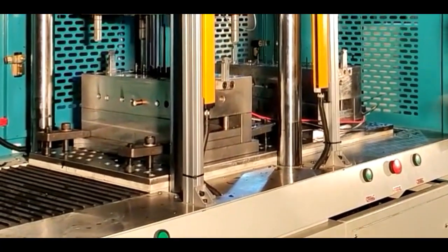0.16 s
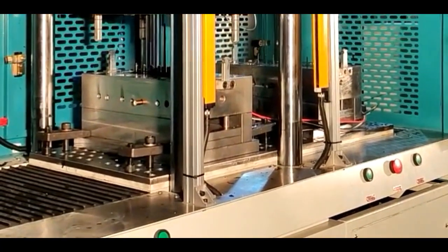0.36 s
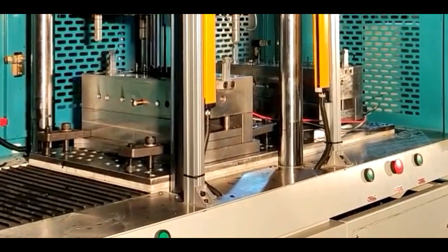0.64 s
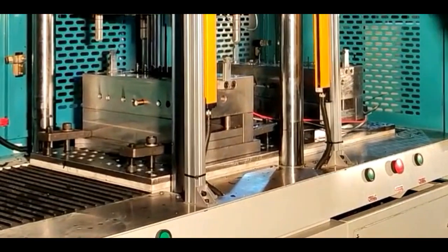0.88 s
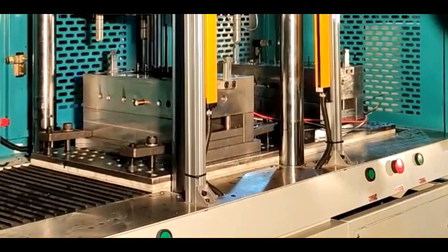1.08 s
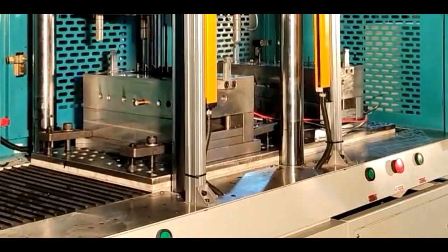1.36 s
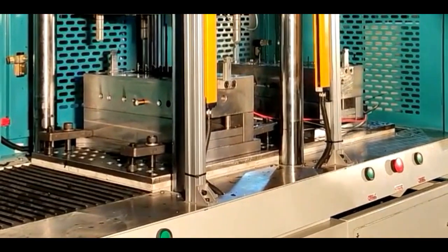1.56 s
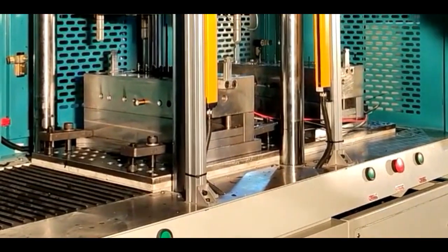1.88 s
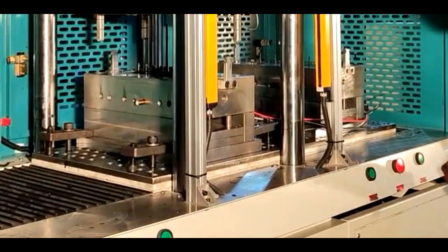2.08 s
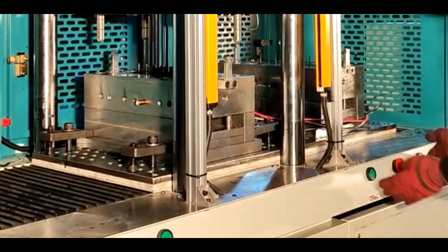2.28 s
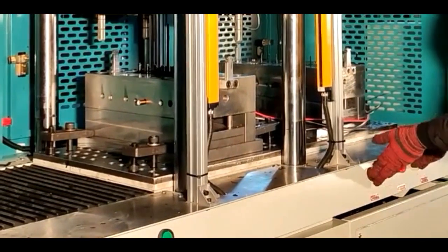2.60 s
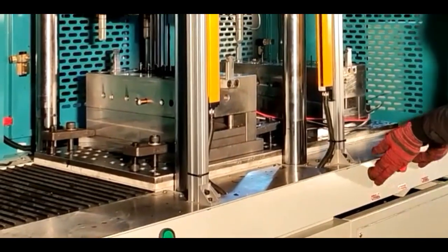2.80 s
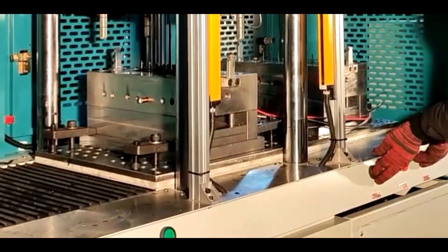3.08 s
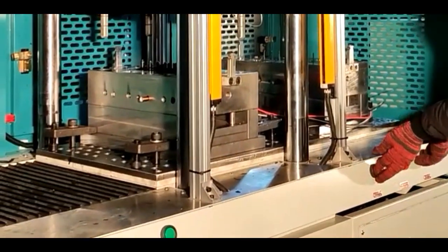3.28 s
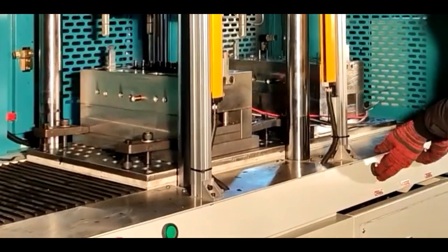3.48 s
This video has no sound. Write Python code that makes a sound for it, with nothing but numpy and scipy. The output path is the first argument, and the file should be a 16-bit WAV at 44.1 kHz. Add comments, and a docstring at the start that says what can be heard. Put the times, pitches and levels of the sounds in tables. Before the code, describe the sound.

Idling moulding machine with fading air hiss, a sharp steel clack, scrape and sheet-metal judder

```python
"""A moulding machine idles in a workshop: pump-motor sines whine over mains hum and a roar of noise.
From the start the filtered-noise hiss of an air gun dies away and small parts tick (rings and noise).
A steel part clacks (noise bursts, decaying modes) and scrapes (random grains ringing a chute, hiss).
Something drops on a sheet-metal panel, whose modes judder; at the end a slide starts to roll (noise,
frame modes). Events get a hall tail; gain control and a low-pass shape the whole."""
import sys
import numpy as np
from scipy import signal
from scipy.io import wavfile
from scipy.ndimage import uniform_filter1d

SR = 44100
rng = np.random.default_rng(int(sys.argv[2]) if len(sys.argv) > 2 else 0)


def unload_audio(sound):
    """Save the sound as a 16-bit wav file, at the path given as the first command line argument."""
    columns = np.transpose(np.atleast_2d(sound))
    # keep every value between -1 and 1, then stretch to whole-number steps
    steps = np.round(np.clip(columns, -1, 1) * 32767)
    wavfile.write(sys.argv[1], SR, steps.astype(np.int16))


N = 160965  # samples


def amp(db):
    """Amplitude factor of a level in dB."""
    return 10 ** (np.asarray(db) / 20)


def rms_one(x):
    """Scale to rms 1."""
    return x / np.sqrt(np.mean(x ** 2) + 1e-20)


def seconds():
    """Time axis in s."""
    return np.arange(N) / SR


def curve(rows, column):
    """Gain from one dB column, interpolated in time, silent outside its span."""
    rows = np.array(rows)
    return amp(np.interp(seconds(), rows[:, 0], rows[:, column], left=-200, right=-200))


def drift(rate_hz):
    """Slow random signal, rms 1: noise through two equal poles, run at SR / 40."""
    pole = np.exp(-2 * np.pi * rate_hz * 40 / SR)
    noise = rng.standard_normal(N // 40 + 2002)
    slow = signal.lfilter([1], [1, -2 * pole, pole * pole], noise)[2000:]  # start-up dropped
    slow = rms_one(slow - slow.mean())
    return np.interp(np.arange(N) / 40, np.arange(len(slow)), slow)


def ring(drive, f_hz, t60_s):
    """Damped resonator: a unit click sets a decaying sine of height 1 ringing."""
    radius = amp(-60 / (t60_s * SR))
    w = 2 * np.pi * f_hz / SR
    return signal.lfilter([0, np.sin(w)], [1, -2 * radius * np.cos(w), radius ** 2], drive + 1e-18)


def modes(drive, table):
    """Resonators on a shared drive, each scaled to rms 1 before its level."""
    return sum(amp(db) * rms_one(ring(drive, f_hz, t60_s)) for f_hz, db, t60_s in table)


def burst(start_s, attack_s, t60_s):
    """Envelope: linear rise, then exponential fall."""
    t = seconds() - start_s
    fall_db = -60 * np.clip(t - attack_s, 0, None) / t60_s
    return np.clip(t / attack_s, 0, 1) * amp(fall_db)


def filtered(x, order, f_hz, kind):
    """Butterworth filter."""
    return signal.sosfilt(signal.butter(order, f_hz, kind, fs=SR, output="sos"), x)


def coloured(spectrum, patchy_db=0.0):
    """Noise in third-octave bands, each with its own level and flicker; rms 1."""
    f_hz, level_db = np.transpose(spectrum)
    edges_hz = f_hz[0] * 2 ** np.arange(0, np.log2(9000 / f_hz[0]) + .3, 1 / 3)
    white = rng.standard_normal((2, N + 8192))  # neighbouring bands use different noise
    out = 0
    for k, (low, high) in enumerate(zip(edges_hz, edges_hz[1:])):
        band = filtered(white[k % 2], 2, [low, high], "band")[8192:]
        flicker_db = patchy_db * drift(5.8) if patchy_db else 0
        band_db = np.interp(np.log(low * high) / 2, np.log(f_hz), level_db)
        out = out + band * amp(band_db + flicker_db)
    return rms_one(out)


SHAFT_HZ = 47.9
# whine of motor and pump: multiple of SHAFT_HZ [1], mean rms level/dB
WHINE_LINES = [(5, -60), (8, -60.5), (15, -60.5), (16, -63), (18, -61.5), (19, -54), (24, -63), (36, -54),
               (37, -58.5), (39, -64.5), (71, -73), (72, -59), (73, -67), (126, -63)]
WHINE_WAVER_DB, WHINE_FLUTTER_DB_PER_KHZ = 1.0, 0.5
# narrow unsteady hums: mean f/Hz, rms wander/Hz, mean rms level/dB
HUM_LINES = [(26.4, 2.3, -56), (42, 1.3, -53.5), (101.1, 1.87, -49), (204.4, 5, -56.5), (241, 2.3, -55.5),
             (445, 3.73, -62.5)]
HUM_WAVER_DB = 2.5


def motor():
    """Rotation gives steady multiples of the shaft speed; hums wander in pitch and level."""
    out = 0
    for multiple, db in WHINE_LINES:
        f_hz = multiple * SHAFT_HZ
        flutter_db = WHINE_FLUTTER_DB_PER_KHZ * f_hz / 1e3 * drift(32)
        level_db = db + WHINE_WAVER_DB * drift(2.2) + flutter_db
        turns = f_hz * seconds() + rng.random()
        out = out + np.sqrt(2) * amp(level_db) * np.sin(2 * np.pi * turns)
    for f_hz, wander_hz, db in HUM_LINES:
        turns = np.cumsum(f_hz + wander_hz * drift(3.8)) / SR + rng.random()
        level_db = db + HUM_WAVER_DB * drift(4.5)
        out = out + np.sqrt(2) * amp(level_db) * np.sin(2 * np.pi * turns)
    return out


CLACK_S, CLACK_ATTACK_S = 1.3543, 0.0025
CRASH_DB, CRASH_T60_S = -12.5, 0.057  # level before envelope and high-pass
CLATTER_DB, CLATTER_ATTACK_S, CLATTER_T60_S = -22, 0.012, 0.18  # likewise
STEEL_DB, BLOW_T60_S = -22, 0.0078
# crash: f/Hz, relative level/(dB per Hz)
CRASH_SPECTRUM = [(900, -28), (1300, -10.5), (1750, -8), (2650, -12.5), (3190, -13), (4200, 0.5),
                  (5170, -5), (6090, -3), (7200, -6), (9500, -25)]
# clatter after the crash: f/Hz, relative level/(dB per Hz)
CLATTER_SPECTRUM = [(900, -39), (1500, -8.5), (2300, 0), (3200, -1.5), (4500, -6), (6500, -9), (9500, -16)]
# modes of the steel part: f/Hz, relative level/dB, t60/s
STEEL_MODES = [(1100, -12, 0.092), (1630, -11.5, 0.14), (2190, -7, 0.094), (3197, -1, 0.12),
               (3410, -9, .07), (3740, -8, 0.18), (4350, -13, .05), (5170, 0, 0.093), (6000, 4.5, 0.044),
               (6120, -3.5, 0.051), (6540, -6.5, 0.12)]


def clack():
    """Impact: a bright crash, a longer clatter, and a short blow that rings the steel modes."""
    crash = coloured(CRASH_SPECTRUM) * burst(CLACK_S, CLACK_ATTACK_S, CRASH_T60_S)
    clatter = coloured(CLATTER_SPECTRUM) * burst(CLACK_S, CLATTER_ATTACK_S, CLATTER_T60_S)
    noise = amp(CRASH_DB) * crash + amp(CLATTER_DB) * clatter
    blow = rng.standard_normal(N) * burst(CLACK_S, CLACK_ATTACK_S, BLOW_T60_S)
    blow /= np.sqrt(np.sum(blow ** 2))  # unit energy
    steel = sum(amp(STEEL_DB + db) * ring(blow, f_hz, t60_s) for f_hz, db, t60_s in STEEL_MODES)
    return filtered(noise, 4, 1150, "high") + steel


# scrape course: t/s, body level/dB, hiss level/dB
SCRAPE_LEVELS = [(1.42, -64.5, -49.5), (1.445, -63, -42), (1.465, -41.5, -31), (1.485, -44, -38),
                 (1.497, -33, -38), (1.525, -36, -28.5), (1.55, -40, -33), (1.59, -41.5, -38),
                 (1.62, -42.5, -44.5), (1.65, -43.5, -50), (1.68, -58, -50.5), (1.78, -54, -52)]
# modes the scrape rings: f/Hz, relative level/dB, t60/s
CHUTE_MODES = [(457, -2, 0.033), (730, -3, 0.023), (994, -4, 0.014), (1715, -6.5, 0.026), (1990, -6, .02),
               (2250, 1, 0.023)]
GRAINS_PER_S, GRIT_DB = 2500, 0.5  # grit relative to chute modes


def scrape():
    """Dense uneven contacts sound as grit and ring the chute; friction hisses above."""
    hits = rng.random(N) < GRAINS_PER_S / SR
    size_db = 3.8 * np.minimum(rng.exponential(1, N), 3)
    grains = hits * amp(size_db) * rng.choice([-1, 1], N)
    rings = modes(grains, CHUTE_MODES)
    grit = filtered(grains, 2, [330, 1600], "band")
    hiss = filtered(rng.standard_normal(N), 2, 2500, "high")
    body = rms_one(rms_one(rings) + amp(GRIT_DB) * rms_one(grit))
    return curve(SCRAPE_LEVELS, 1) * body + curve(SCRAPE_LEVELS, 2) * rms_one(hiss)


# ticks, pings, clanks of small parts:
# t/s, level/dB, f/Hz, half-bandwidth/f [1] (clipped to 0.01-0.8), attack/s, t60/s
TICK_EVENTS = [(0.577, -35, 7600, .1, .002, .03), (.585, -28, 7770, 0.12, .002, 0.044),
               (1.190, -22, 5860, .7, 0.0012, .015), (1.336, -32, 2420, 0.41, 0.0034, 0.083),
               (1.489, -29.5, 1720, 0.027, 0.003, 0.075), (1.490, -28, 2180, .04, .004, 0.05),
               (1.456, -34.5, 5000, 0.39, .004, .05), (1.478, -30.5, 2350, .05, .004, .08),
               (1.488, -33.5, 1315, 0.0075, .008, .25), (1.572, -37, 1305, 0.011, 0.0098, .25),
               (1.628, -41.5, 1318, 0.012, 0.0056, .2), (1.575, -34, 477, 0.14, 0.013, .1),
               (1.882, -43, 1320, 0.011, 0.0089, .3), (1.885, -37, 750, 0.68, .02, .2),
               (1.952, -39, 4480, 0.85, .004, .06), (2.016, -32, 5000, 0.5, .005, .08),
               (1.519, -22.5, 7040, 0.064, .003, .05), (1.528, -21.5, 7500, 0.09, 0.0035, 0.027),
               (1.7954, -31.5, 7330, 0.2, 0.00077, 0.06), (1.8200, -19.5, 3300, 0.036, 0.001, 0.011),
               (1.8197, -19.5, 5720, 0.25, 0.00091, 0.025), (1.8240, -14, 3050, 0.016, 0.0021, 0.014),
               (1.8250, -17, 5200, .05, .001, 0.005), (1.8250, -19, 2180, 0.028, 0.00053, .018),
               (1.825, -27, 7000, .1, 0.00083, 0.0081), (3.303, -33, 6600, 0.16, .001, 0.022),
               (3.355, -42, 2910, .05, .003, .04), (3.375, -36, 2386, 0.062, 0.0074, 0.037),
               (3.610, -32, 988, 0.15, .012, .12)]


def ticks():
    """Each tick is a ring and noise about its pitch; the wider it is, the noisier."""
    out, white = 0, rng.standard_normal(N)
    for start_s, db, f_hz, width, attack_s, t60_s in TICK_EVENTS:
        width = np.clip(width, .01, .8)
        band = filtered(white, 2, [f_hz * (1 - width), f_hz * (1 + width)], "band")
        noisy = min(1, 6 * width)
        sine = np.sin(2 * np.pi * f_hz * (seconds() - start_s))
        tone = (1 - noisy) * sine + noisy * rms_one(band) / 2
        out = out + amp(db) * burst(start_s, attack_s, t60_s) * tone
    return out


# knocks on the panel: t/s, drive level/dB
KNOCK_EVENTS = [(1.941, -22.5), (1.979, -26.5), (2.004, -22), (2.039, -24), (2.079, -29.5), (2.11, -29.5),
                (2.149, -33.5), (2.181, -33), (2.205, -36), (2.259, -41), (2.276, -32.5), (2.319, -35),
                (2.348, -45), (2.384, -38.5), (2.411, -40), (2.479, -37)]
KNOCK_HZ, KNOCK_T60_S = 193, 0.017
KNOCK_LEAD_S = 0.00705  # push starts this long before the listed time
# panel modes: f/Hz, relative level/dB, t60/s
PANEL_MODES = [(87, -11, 0.13), (133.4, -13, 0.21), (183.3, 5, 0.054), (209, 6, 0.053),
               (286.5, -4.5, 0.078), (367, -4, 0.055), (446, -6, 0.067), (597, -5, 0.062)]
# loose parts: f/Hz, relative level/(dB per Hz)
RATTLE_SPECTRUM = [(250, 1.5), (400, -1), (800, -3.5), (1200, -11), (2000, -13), (4000, -10), (9500, -17.5)]
RATTLE_DB, RATTLE_ATTACK_S, RATTLE_T60_S = -12.5, 0.014, 0.18  # level relative to knock drive


def panel():
    """Each knock is a springy push of a few cycles that swells the modes; loose parts rattle along."""
    clicks, shake = np.zeros(N), 0
    for start_s, db in KNOCK_EVENTS:
        clicks[int((start_s - KNOCK_LEAD_S) * SR)] = amp(db)
        shake = shake + amp(db) * burst(start_s, RATTLE_ATTACK_S, RATTLE_T60_S)
    push = ring(clicks, KNOCK_HZ, KNOCK_T60_S) * 2 * np.pi * KNOCK_HZ / SR
    boom = 0
    for k, (f_hz, db, t60_s) in enumerate(PANEL_MODES):
        boom = boom + (-1) ** k * amp(db) * ring(push, f_hz, t60_s)  # alternating polarity
    return boom + amp(RATTLE_DB) * shake * coloured(RATTLE_SPECTRUM)


# slide course: t/s, level/dB
SLIDE_LEVELS = [(3.26, -55), (3.34, -43.5), (3.46, -45.5), (3.52, -36), (3.59, -31.5), (3.607, -32),
                (3.622, -27), (3.635, -32.5), (3.65, -27)]
# rolling noise: f/Hz, relative level/(dB per Hz)
SLIDE_SPECTRUM = [(25, -16), (60, -3), (100, -1), (160, -5.5), (300, -8.5), (600, -13.5), (900, -11.5),
                  (1400, -17), (2000, -22.5), (3500, -22), (5500, -26), (9500, -22.5)]
# frame modes the slide rings: f/Hz, relative level/dB, t60/s
FRAME_MODES = [(276, -10, 0.079), (430, -6.5, 0.13), (773, -11.5, 0.09), (1048, -11, 0.14)]


def slide():
    """Rolling gives coloured noise; lumpy bumps ring the frame."""
    rolling = coloured(SLIDE_SPECTRUM, patchy_db=0.5)
    bumps = rng.standard_normal(N) * amp(1.2 * drift(25))
    return curve(SLIDE_LEVELS, 1) * rms_one(rolling + modes(bumps, FRAME_MODES))


# air gun hiss: f/Hz, relative level/(dB per Hz)
AIR_SPECTRUM = [(800, -23), (1300, -10.5), (2000, -5), (2800, -2), (4400, -2), (6000, -5), (9500, -13)]
AIR_START_DB, AIR_T60_S = -32.5, 1.8


def air_gun():
    """Hiss already dying away exponentially in the hall at t = 0."""
    level_db = AIR_START_DB - 60 * seconds() / AIR_T60_S
    return amp(level_db) * coloured(AIR_SPECTRUM, patchy_db=0.16)


# workshop roar: f/Hz, relative level/(dB per Hz)
ROAR_SPECTRUM = [(18, -14.5), (28, 3), (50, -5), (70, -4), (100, -6.5), (140, -4), (220, -10), (330, -10),
                 (450, -15.5), (600, -16), (850, -15), (1300, -17.5), (1600, -22.5), (2100, -18),
                 (3200, -22), (4500, -24), (5800, -26), (7500, -24.5), (9500, -24.5)]
ROAR_DB, ROAR_PATCHY_DB = -42.5, 1.3


def roar():
    """Workshop rumble and hiss: noise whose bands flicker independently."""
    return amp(ROAR_DB) * coloured(ROAR_SPECTRUM, ROAR_PATCHY_DB)


HALL_DB, HALL_T60_S, HALL_BAND_HZ = -10.5, 2.9, [260, 5200]


def hall(x):
    """Diffuse tail: convolution with dull, decaying noise of unit energy."""
    tail = rng.standard_normal(N) * burst(0.0025, 0.013, HALL_T60_S)
    tail = filtered(tail, 1, HALL_BAND_HZ, "band")
    return amp(HALL_DB) * signal.fftconvolve(x, tail / np.sqrt(np.sum(tail ** 2)))[:N]


CLOSE_SEND_DB = -6  # clack and ticks are close by: less hall


def scene():
    """Near events with their hall tail over the steady machine."""
    close = clack() + ticks()
    farther = scrape() + panel()
    tail = hall(farther + amp(CLOSE_SEND_DB) * close)
    return (motor() + close + farther + tail + slide() + air_gun() + roar())[None]


LIMIT_DB, LIMIT_SHARE, RECOVER_DB_PER_S = -20.5, 0.95, 91
CUTOFF_HZ = 8300


def record(dry):
    """Gain control ducks after loud hits and recovers at a fixed dB rate; the top is cut."""
    level_db = 10 * np.log10(uniform_filter1d(dry[0] ** 2, size=220) + 1e-12)  # 5 ms mean
    slope_db = RECOVER_DB_PER_S * seconds()
    held_db = np.maximum.accumulate(level_db + slope_db) - slope_db
    over_db = np.clip(held_db - LIMIT_DB, 0, None)
    duck_db = signal.lfilter([.002], [1, -.998], LIMIT_SHARE * over_db)  # 11 ms smoothing
    low_pass = signal.ellip(12, .5, 70, CUTOFF_HZ, fs=SR, output="sos")
    return signal.sosfilt(low_pass, dry * amp(-duck_db))


dry = scene()
out = record(dry)
unload_audio(out)
```